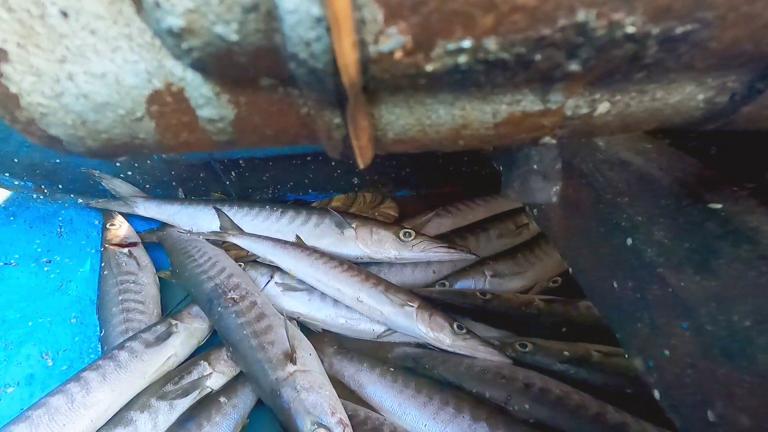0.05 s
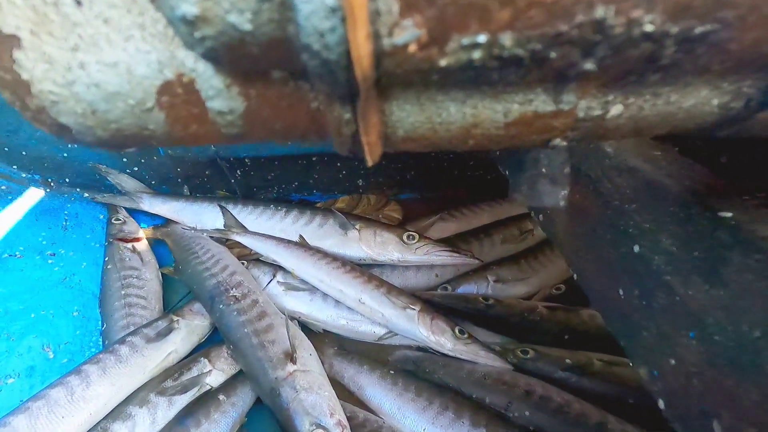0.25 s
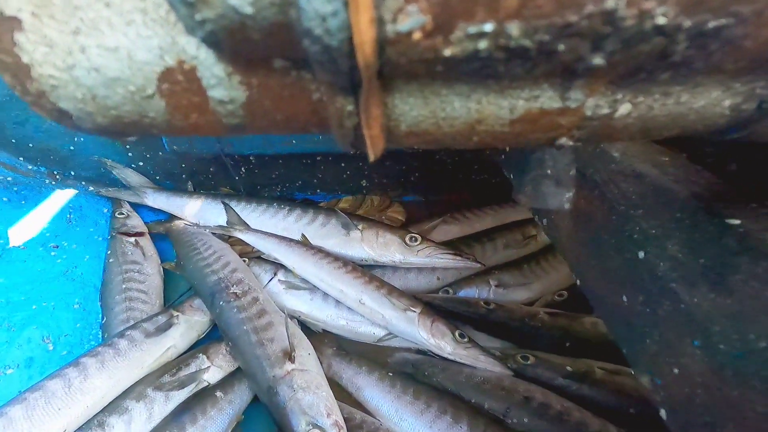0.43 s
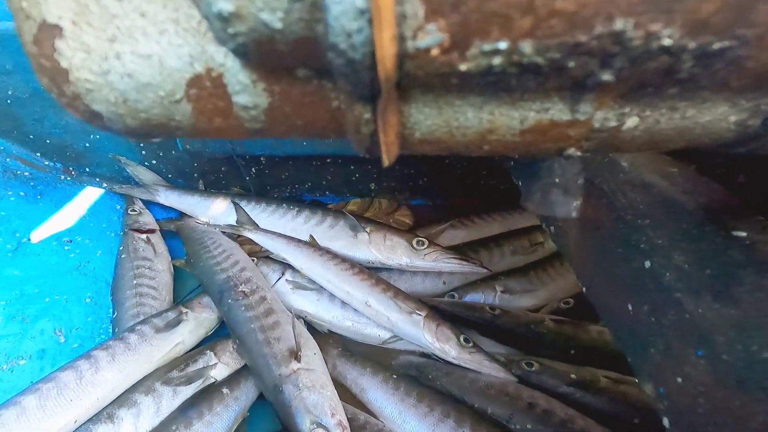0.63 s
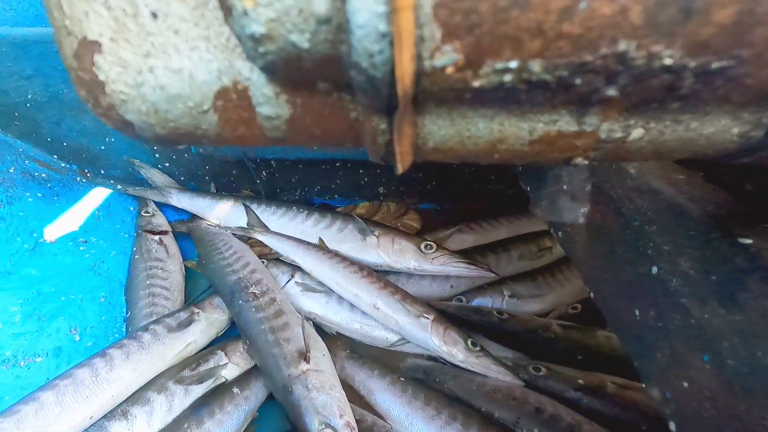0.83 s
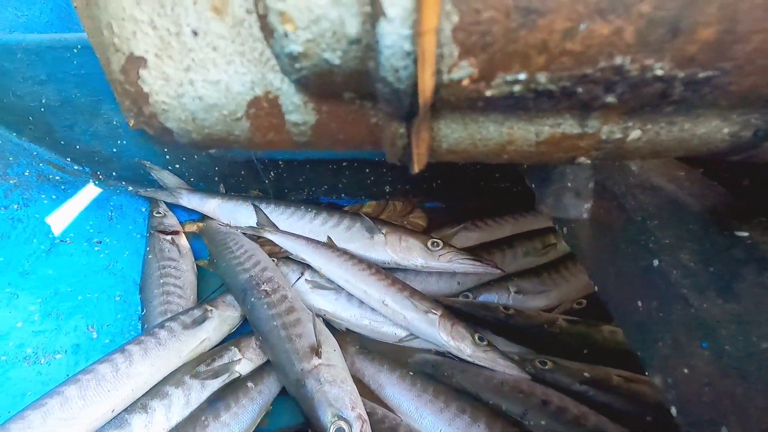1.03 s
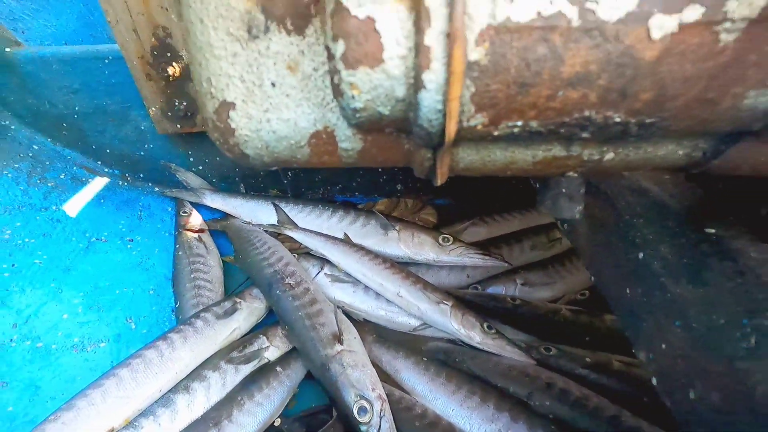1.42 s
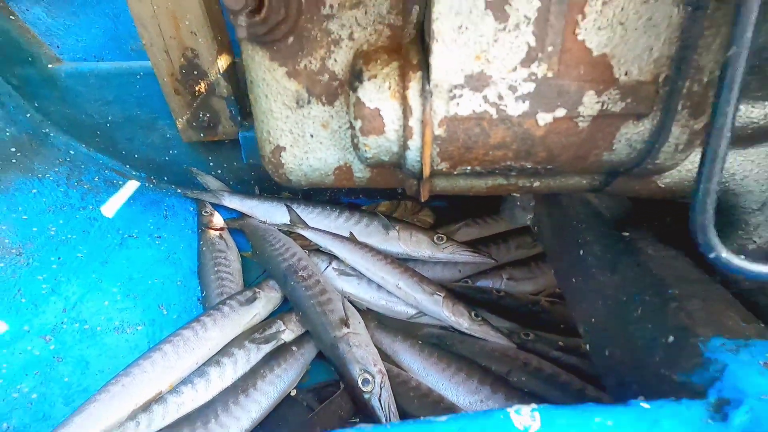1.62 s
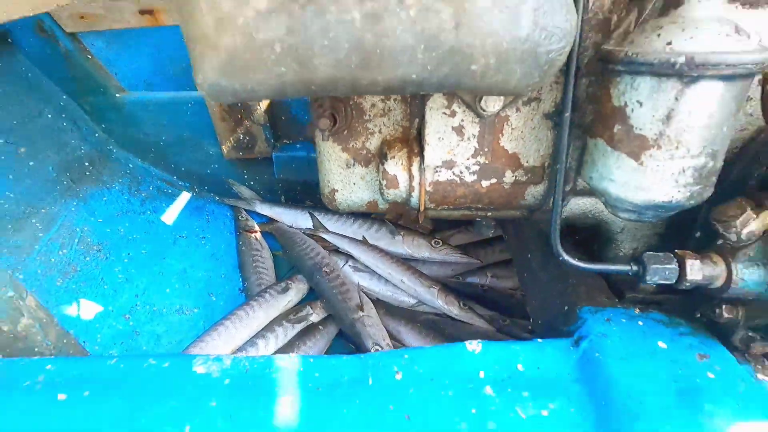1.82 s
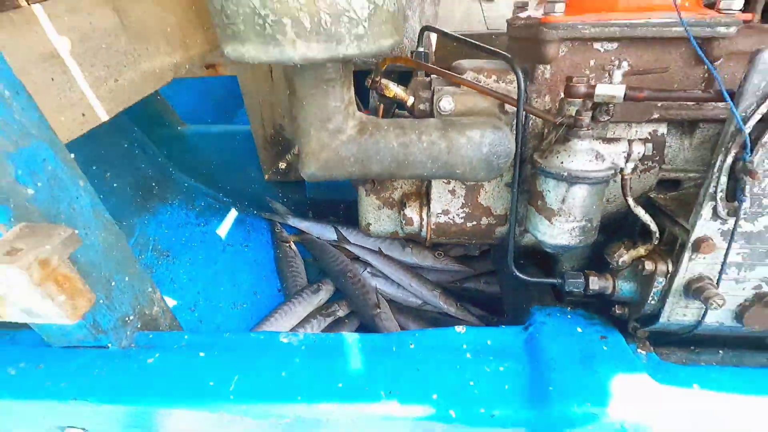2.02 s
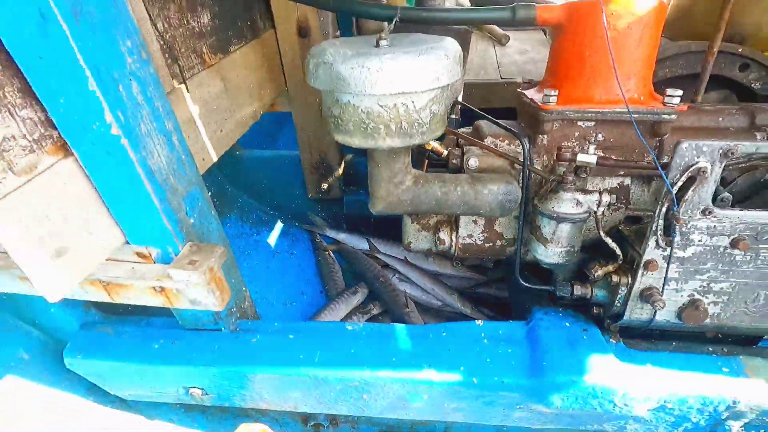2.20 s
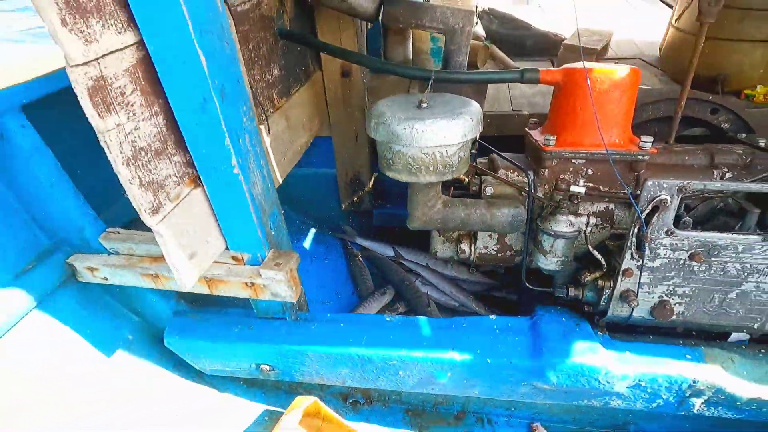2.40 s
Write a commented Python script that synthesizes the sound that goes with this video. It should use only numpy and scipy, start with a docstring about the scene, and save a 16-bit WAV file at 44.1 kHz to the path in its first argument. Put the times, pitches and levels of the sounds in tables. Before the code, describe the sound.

Loose boards knock and rattle against a wooden boat's hull, followed by footfalls and rustling clothes.

```python
"""In a small wooden boat, someone shifts about and straightens up.
Loose boards knock twice against the hull, each time with a rattle of rebounds; every impact excites the
damped modes of hull and planks. Feet thud and scuff, small things clink, and light scrapes follow the
knocks. Friction of cloth on cloth gives a swell of hiss. A low rumble and a light wind lie under it all,
and early reflections between the sides of the boat colour the treble."""
import sys
import numpy as np
from scipy import signal
from scipy.fft import rfft, irfft
from scipy.io import wavfile
from scipy.ndimage import uniform_filter1d, minimum_filter1d

SR = 44100
rng = np.random.default_rng(int(sys.argv[2]) if len(sys.argv) > 2 else 0)


def unload_wav(signal):
    """Save mono or channel-first audio to the path in sys.argv[1] as 16-bit WAV at rate SR, clipped to [-1, 1]."""
    wavfile.write(
        sys.argv[1],
        SR,
        np.round(np.clip(np.atleast_2d(signal).T, -1, 1) * 32767).astype(np.int16),
    )


N = 112454

# course of the hull's rumble: time_s, level_db
RUMBLE_LEVELS = [(0, -37.5), (0.299, -35), (0.499, -42), (1.05, -41), (1.4, -40), (1.55, -38), (1.75, -37),
                 (1.85, -33.5), (1.97, -30), (2.1, -32), (2.3, -31), (2.42, -39), (2.55, -38.5)]
# course of the sliding of clothes: time_s, level_db, treble_db
CLOTH_LEVELS = [(0, -53, -2.5), (.17, -75, 28), (.21, -41, -25), (0.441, -80, -12), (.68, -77.5, 14.5),
                (.92, -81, 2), (1.14, -75, 15), (1.19, -57, -7), (1.38, -60, 5), (1.45, -59, -1),
                (1.53, -62, 13.5), (1.62, -59, 17), (1.73, -55.5, 15), (1.85, -55.5, 9), (1.93, -44.5, 3),
                (2.03, -44.5, 6), (2.1, -47.5, 6.5), (2.2, -38, -8.5), (2.28, -53, 0.5), (2.349, -53.5, 0),
                (2.39, -65, -12), (2.55, -69, 20)]
# puffs of wind: start_s, length_s, level_db
BUFFETS = [(.05, .3, -40), (2.14, .36, -31.5)]
# soles dragging on the planks: start_s, hold_s, level_db, bass_db, treble_db, pan_db
SCUFFS = [(.0575, 0.015, -51, 14, 13, 3.5), (.079, 0.032, -45, 16, 6.5, 1.5),
          (.186, .001, -59.5, -18, 11.5, 3), (.340, 0.0018, -71.5, -11.5, 15, 1),
          (.466, .002, -69, -6, 8.5, 5), (.574, 0.019, -56.5, 23.5, -11.5, 0),
          (.610, 0.0023, -72, 0, 11, 3), (1.468, 0.0017, -57.5, -18, 12.5, 4.5),
          (1.494, 0.0036, -49.5, -29, -1.5, 1), (1.899, 0.033, -44.5, 12.5, -4, 3.5),
          (2.106, 0.0038, -29, 4, -9, 5.5), (2.117, 0.0033, -32.5, 9.5, -9.5, 1),
          (2.152, 0.0042, -32, 5, -5.5, 6), (2.171, 0.005, -28.5, 6, -3, 1.5),
          (2.185, 0.0017, -39.5, 17.5, -14, 8), (2.321, 0.011, -44.5, 17, -2.5, 2),
          (2.495, 0.0013, -49.5, -28, 2, 9), (2.518, 0.005, -52.5, 15.5, 10, 5.5)]
# small hard things struck: start_s, level_db, pitch_hz
CLINKS = [(.058, -42.5, 1043), (.254, -26, 1646), (1.329, -40, 2880), (1.497, -51, 2830),
          (1.899, -39.5, 1124), (2.178, -31.5, 564), (2.496, -49.5, 2033)]
# blows of boards on the hull: start_s, level_db, bass_db, clack_db, treble_db, t60_ratio, board_hz
KNOCKS = [(.222, -18.5, 6, -2.5, 6, 1.4, 553), (.228, -15.5, -3.5, -7, 5, 1.2, 1164),
          (.238, -20, 9, 4, 6, 0.91, 272), (.2535, -17, 5.5, 10.5, 8.5, 0.97, 840),
          (.259, -16, 9, -12, -6, 0.68, 550), (.270, -25, 9.5, -18, -6, 0.72, 246),
          (.279, -22, -7.5, -4, -3, 1, 810), (.308, -21.5, -2.5, -4, -1.5, 1.33, 968),
          (.3325, -15, -4, -15, -6, 0.66, 1085), (.783, -27.5, -3, 7.5, -2.5, 1, 2103),
          (.7875, -18.5, -3.5, 3.5, -18, 1, 947), (.8295, -26.5, 3, -2, -3.5, 0.87, 905),
          (.8335, -19.5, -6.5, -3, -26, 0.87, 1060), (.858, -28.5, 4.5, -10, -17, 0.83, 397)]
# normal modes of the hull: frequency_hz, level_db, t60_s
HULL_MODES = [(135.4, -9, 0.35), (168.7, -19.5, 0.33), (197.7, -12, 0.28), (243.2, -5, 0.11),
              (265.2, -4.5, 0.24), (340, -18, 0.35), (401.2, -15.5, 0.2), (541, -18, 0.22),
              (623, -15.5, 0.22), (782, -19.5, 0.15), (888.6, -14.5, 0.17), (998, -21, 0.33),
              (1048, -13.5, 0.11), (1630, -19.5, 0.15)]
# soft footfalls: start_s, level_db, pitch_hz, t60_s, pan_db
THUDS = [(.576, -44, 362, .2, 1), (.584, -26.5, 101.3, 0.19, -1), (1.14, -25.5, 63, 0.29, 2),
         (2.001, -26, 296, 0.16, 0), (2.003, -18, 133.2, 0.24, 2.5), (2.116, -18.5, 137.8, 0.27, 0),
         (2.246, -29, 53, 0.22, -9), (2.260, -19, 332.6, 0.057, -13.5), (2.262, -22, 167.7, .12, -14.5),
         (2.327, -22, 124, 0.13, 2.5)]
# light scrapes: start_s, hold_s, level_db, treble_db
SCRAPES = [(1.178, 0.065, -71.5, 14), (1.212, 0.026, -63.5, 6), (1.234, 0.013, -55, 5),
           (1.295, 0.016, -39, -3), (1.329, 0.014, -50.5, -0.5)]

# relative spectral densities of the noise sources: frequency_hz, density_db
RUMBLE_SPECTRUM = [(25, -5.5), (50, -6), (66, 5), (78, 5.5), (98, -7.5), (130, -4), (180, -13.5),
                   (260, -23.5), (450, -36.5), (900, -40)]
WIND_SPECTRUM = [(12, -22.5), (30, 7.5), (50, 0), (90, -47), (200, -55), (900, -109)]
AIR_SPECTRUM = [(100, -8.5), (400, 3.5), (750, -13), (1100, 0), (2200, -15.5), (5000, -16.5), (7500, -17),
                (10000, -32), (15000, -30)]
CLOTH_SPECTRUM = [(180, -1), (330, 11), (570, 6.5), (800, -3.5), (1120, -4), (1300, -2), (1950, -3.5),
                  (2400, -8), (3100, -11.5), (4000, -11), (5100, -13), (6200, -21.5), (7300, -19.5),
                  (9500, -32), (12600, -35.5), (14000, -46.5), (15500, -63.5)]
SCUFF_SPECTRUM = [(60, 14.5), (200, -1.5), (450, -4), (750, -1), (1100, 4), (1500, 3.5), (2200, 2.5),
                  (4500, -5), (8000, -14.5), (12800, -34.5), (15500, -50)]
PLANK_SPECTRUM = [(30, -26), (90, 3), (150, 4), (320, 3), (700, -6), (1100, -7.5), (1700, -12.5),
                  (2500, -21.5), (4000, -33.5), (7000, -48.5), (11000, -64.5), (15000, -74)]
SCRAPE_SPECTRUM = [(300, -4), (800, -15), (1250, 1), (2550, -1.5), (2900, 8), (3300, 4), (4400, 0.5),
                   (7000, -10.5), (9500, -25.5), (12500, -36), (15000, -55)]
# decay times after rubbing and of struck planks: frequency_hz, t60_s
RUB_DECAY = [(150, 0.4), (1000, 0.14), (4000, 0.14), (12000, 0.14)]
PLANK_DECAY = [(80, .25), (300, 0.26), (1000, 0.2), (2500, 0.13), (6000, 0.17), (14000, 0.06)]
# likeness of the two channels: frequency_hz, coherence
COHERENCE = [(25, 0.92), (70, 0.99), (200, 0.97), (550, 0.84), (1600, 0.49), (5000, 0.63), (15000, 0.38)]
# level of the left channel over the right: frequency_hz, pan_db
BALANCE = [(60, 1), (200, 0.65), (550, 1.5), (1800, 4.5), (5000, 1.5), (15000, 7)]

BASS_HZ, MID_HZ, CLACK_HZ, TREBLE_HZ = 310, 1170, 2400, 4300
STRIKE_RISE_S, RUB_GRIT_DB = 0.00038, 0.5
EVENT_SIZE = 16384  # samples in one contact sound
EVENT_T = np.arange(EVENT_SIZE) / SR


def amp(db):
    """Amplitude ratio of a level in decibels."""
    return 10 ** (np.asarray(db) / 20)


def unit_power(x):
    """Normalisation to a mean square of one."""
    return x / np.sqrt(np.mean(x ** 2) + 1e-20)


def curve_at(points, hz):
    """Interpolation on a logarithmic frequency axis."""
    frequencies, values = np.transpose(points)
    return np.interp(np.log(hz + 1), np.log(frequencies + 1), values)


def pan(pan_db):
    """Level difference: left and right gains that lie pan_db apart."""
    return amp(np.array([[.5], [-.5]]) * pan_db)


def noise(spectrum, size, bass_db=0, treble_db=0, pan_db=None):
    """Partial coherence: coloured stereo noise is the sum and difference of two random-phase signals."""
    hz = np.fft.rfftfreq(size, 1 / SR)
    phasors = np.exp(2j * np.pi * rng.random((2, len(hz))))
    coherence = curve_at(COHERENCE, hz)
    mid = phasors[0] * np.sqrt((1 + coherence) / 2)
    side = phasors[1] * np.sqrt((1 - coherence) / 2)
    # bright and dull sounds differ most in the top octave
    tilt = [(BASS_HZ, bass_db), (MID_HZ, 0), (TREBLE_HZ, treble_db), (12000, 1.88 * treble_db)]
    colour = unit_power(amp(curve_at(spectrum, hz))) * amp(curve_at(tilt, hz))
    gains = pan(curve_at(BALANCE, hz) if pan_db is None else pan_db)
    return irfft(np.array([mid + side, mid - side]) * colour * gains, size) * np.sqrt(size)


def grit(depth_db, size, smooth_samples=40):
    """Amplitude modulation: a rough contact flickers on a scale of milliseconds."""
    flicker = uniform_filter1d(uniform_filter1d(rng.standard_normal(size), smooth_samples), 30)
    return unit_power(amp(depth_db * unit_power(flicker)))


def die_away(x, rise_s, hold_s, decay):
    """Frequency-dependent damping: after rise and hold, each octave decays at its own rate."""
    hz, spectrum = np.fft.rfftfreq(EVENT_SIZE, 1 / SR), rfft(x)
    centres_hz = np.geomspace(100, 12800, 8)
    free_s = np.maximum(EVENT_T - hold_s, 0)
    sound = 0
    for centre_hz, weights in zip(centres_hz, np.eye(8)):
        band = irfft(spectrum * curve_at(np.c_[centres_hz, weights], hz), EVENT_SIZE)
        sound += band * np.exp(-np.log(1000) * free_s / curve_at(decay, centre_hz))
    return np.minimum(EVENT_T / rise_s, 1) * sound


def ring(hz, t60_s):
    """Free vibration of a damped oscillator, falling 60 dB in t60_s."""
    return np.sin(2 * np.pi * hz * EVENT_T) * np.exp(-np.log(1000) * EVENT_T / t60_s)


def butterworth(x, cutoff_hz, kind):
    """Second-order filtering: 12 dB per octave beyond the cutoff."""
    return signal.sosfilt(signal.butter(2, cutoff_hz, kind, fs=SR, output="sos"), x)


def background():
    """Incoherent noises add: a low rumble in the hull, a steady breeze and faint outdoor air."""
    rumble_db = np.interp(np.arange(N) / SR, *np.transpose(RUMBLE_LEVELS))
    rumble = butterworth(noise(RUMBLE_SPECTRUM, N), 900, "low")
    breeze = butterworth(noise(WIND_SPECTRUM, N), 300, "low")
    return amp(rumble_db) * rumble + amp(-49.5) * breeze + amp(-70) * noise(AIR_SPECTRUM, N)


def clothing(echo_s=.00093, echo_gain=.3, drift_per_s=.2):
    """Friction of cloth makes hiss; interference with a plank's drifting reflection comb-filters it."""
    t = np.arange(N) / SR
    time_s, level_db, treble_db = np.transpose(CLOTH_LEVELS)
    direct = butterworth(noise(CLOTH_SPECTRUM, N), 261, "high")
    delay_s = echo_s * np.exp(drift_per_s * (t - t.mean()))
    reflected = np.array([np.interp(t - delay_s, t, channel) for channel in direct])
    hiss = unit_power(direct + echo_gain * reflected) * grit(depth_db=0.9, size=N)
    low = signal.sosfiltfilt(signal.butter(1, 2200, fs=SR, output="sos"), hiss)
    treble = amp(np.interp(t, time_s, treble_db)) * (hiss - low)
    return amp(np.interp(t, time_s, level_db)) * (low + treble)


def buffet(length_s, level_db):
    """Pressure fluctuation: a puff of wind on the microphone swells and fades as very low noise."""
    size = 2 * round(length_s * SR / 2)
    return amp(level_db) * noise(WIND_SPECTRUM, size) * np.hanning(size)


def scuff(hold_s, level_db, bass_db, treble_db, pan_db, catch_s=0.0053):
    """Sliding friction: a sole catches, drags over grit, and the sound dies away in the hull."""
    catch = 1 + amp(1) * np.exp(-(EVENT_T / catch_s) ** 2)
    rub = noise(SCUFF_SPECTRUM, EVENT_SIZE, bass_db, treble_db, pan_db) * grit(RUB_GRIT_DB, EVENT_SIZE)
    rise_s = 0.00055 + 0.11 * hold_s  # a long drag builds up more slowly
    return amp(level_db) * catch * die_away(rub, rise_s, hold_s, RUB_DECAY)


def clink(level_db, pitch_hz):
    """Damped vibration: a small hard thing rings in one mode and buzzes a little."""
    attack = np.minimum(EVENT_T / STRIKE_RISE_S, 1)
    note = pan(curve_at(BALANCE, pitch_hz)) * ring(pitch_hz, t60_s=.12)
    buzz = grit(depth_db=3, size=EVENT_SIZE, smooth_samples=120)
    return amp(level_db) * attack * note * buzz


def knock(level_db, bass_db, clack_db, treble_db, t60_ratio, board_hz, impact_s=0.0058):
    """Impact excitation: a loose board rings itself, hull and planks; pressing on them adds damping."""
    colour = [(149, 0.12 * bass_db),  # the deepest modes vary less from blow to blow
              (BASS_HZ, bass_db), (MID_HZ, 0), (CLACK_HZ, clack_db), (TREBLE_HZ, treble_db)]
    detune = 1 + .005 * rng.standard_normal(len(HULL_MODES))  # each blow lands elsewhere
    hull = 0
    for k, (hz, mode_db, t60_s) in enumerate(HULL_MODES):
        gains = amp(mode_db + curve_at(colour, hz)) * pan(curve_at(BALANCE, hz))
        hull += (-1) ** k * gains * ring(hz * detune[k], t60_s * t60_ratio)
    board = pan(curve_at(BALANCE, board_hz)) * ring(board_hz, t60_s=.08)
    # the planks' modes lie so close that they ring as noise
    plank_gains = amp(curve_at(colour, np.fft.rfftfreq(EVENT_SIZE, 1 / SR)))
    plank_noise = irfft(rfft(noise(PLANK_SPECTRUM, EVENT_SIZE)) * plank_gains)
    decay = [(hz, t60_s * t60_ratio) for hz, t60_s in PLANK_DECAY]
    planks = die_away(plank_noise, STRIKE_RISE_S, 0, decay)
    impact = 1 + amp(-7) * np.exp(-(EVENT_T / impact_s) ** 2)  # the contact, heard before the ring
    attack = np.minimum(EVENT_T / STRIKE_RISE_S, 1)
    return amp(level_db) * ((amp(3.5) * hull + amp(-7.5) * board) * attack + amp(-3.5) * impact * planks)


def thud(level_db, pitch_hz, t60_s, pan_db, rise_cycles=1.62, step_octaves=0.19):
    """Soft impact: a foot pushes a board, exciting a short low note in a puff of narrow-band noise."""
    band = [(pitch_hz * 2 ** (k * step_octaves), -3 * k ** 2) for k in range(-5, 6)]
    puff = noise(band, EVENT_SIZE, pan_db=pan_db) * np.exp(-np.log(1000) * EVENT_T / t60_s)
    note = pan(pan_db) * ring(pitch_hz, t60_s)
    attack = np.minimum(EVENT_T * pitch_hz / rise_cycles, 1)
    return amp(level_db) * attack * (amp(-2.5) * puff + amp(-1.5) * note)


def scrape(hold_s, level_db, treble_db, rise_s=0.0013):
    """Light friction: thin, gritty noise shaped by a resonance near 3 kHz."""
    rub = noise(SCRAPE_SPECTRUM, EVENT_SIZE, treble_db=treble_db) * grit(RUB_GRIT_DB, EVENT_SIZE)
    return amp(level_db) * die_away(rub, rise_s, hold_s, RUB_DECAY)


def reflections(x, count=14, spread_s=.009, share=0.5):
    """Interference: early reflections between the boat's sides give the treble a steady, uneven colour."""
    polarity = rng.choice([-1., 1.], count)
    delays = ((1 + (count - 1) * rng.random(count)) / count * spread_s * SR).astype(int)
    strengths = polarity + 0.87 * rng.standard_normal((2, count))  # unlike in the two channels
    taps = np.zeros((2, 2048))
    taps[:, delays] = unit_power(strengths) / np.sqrt(count)
    treble = butterworth(x, MID_HZ, "high")
    return x + share * signal.fftconvolve(treble, taps, axes=1)[:, :N]


def scene():
    """Superposition: all sources add, each at its own time, and reflect inside the boat."""
    mix = background() + clothing()
    for events, source in ((KNOCKS, knock), (THUDS, thud), (SCUFFS, scuff),
                           (SCRAPES, scrape), (CLINKS, clink), (BUFFETS, buffet)):
        for start_s, *settings in events:
            start = round(start_s * SR)
            sound = source(*settings)[:, :N - start]
            mix[:, start:start + sound.shape[1]] += sound
    return reflections(mix)


def record(dry, ceiling=.72, window_s=.008, cutoff_hz=15400):
    """Peak and band limiting: the gain eases down on the highest peaks, then a low-pass filter acts."""
    window = round(window_s * SR)
    gain = np.minimum(ceiling / (abs(dry).max(0) + 1e-9), 1)
    limited = dry * uniform_filter1d(minimum_filter1d(gain, window), window)
    lowpass = signal.firwin(511, cutoff_hz, window=("kaiser", 9), fs=SR)
    return signal.oaconvolve(limited, lowpass[None], "same")


dry = scene()
out = record(dry)
unload_wav(out)
```